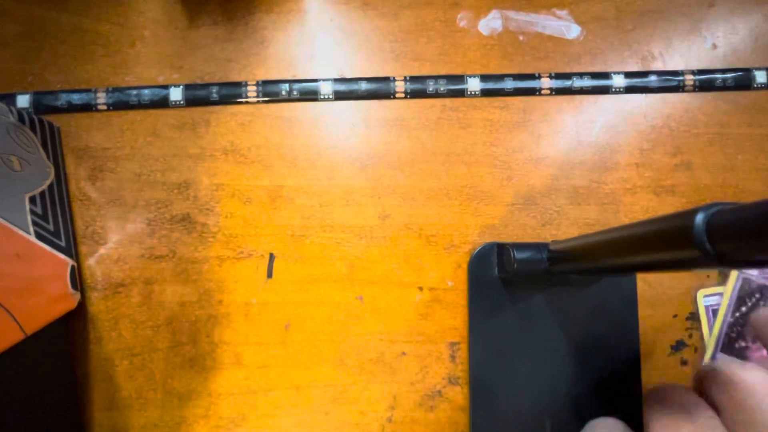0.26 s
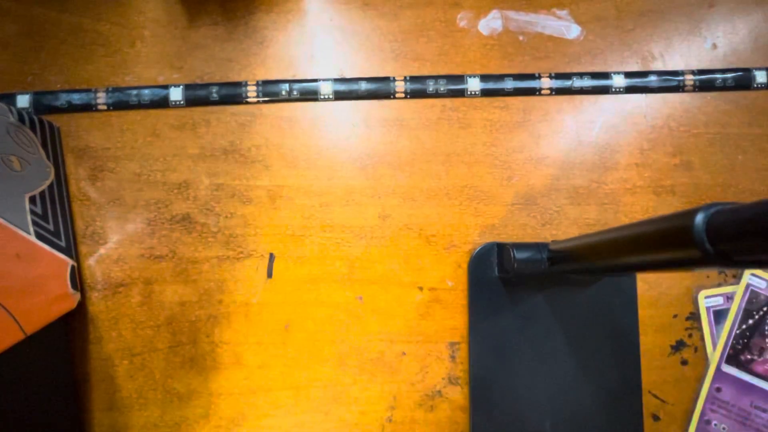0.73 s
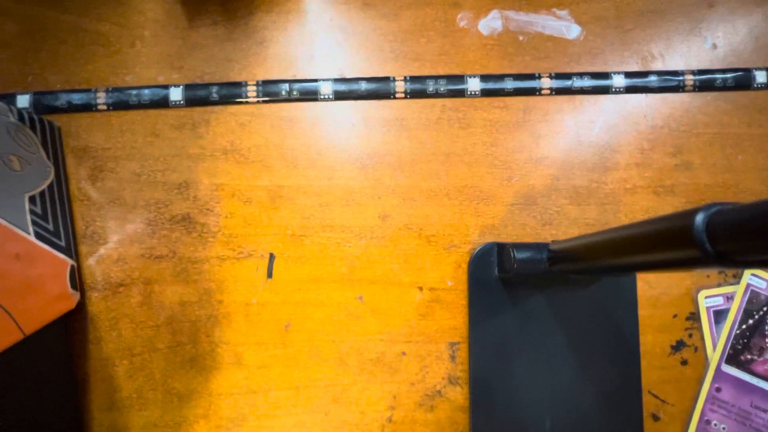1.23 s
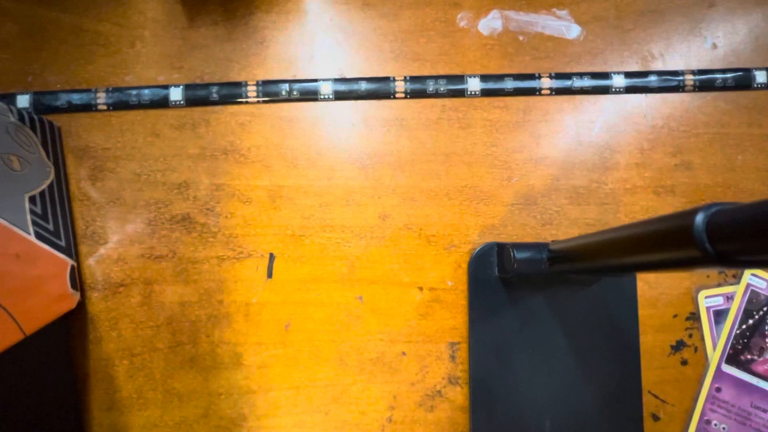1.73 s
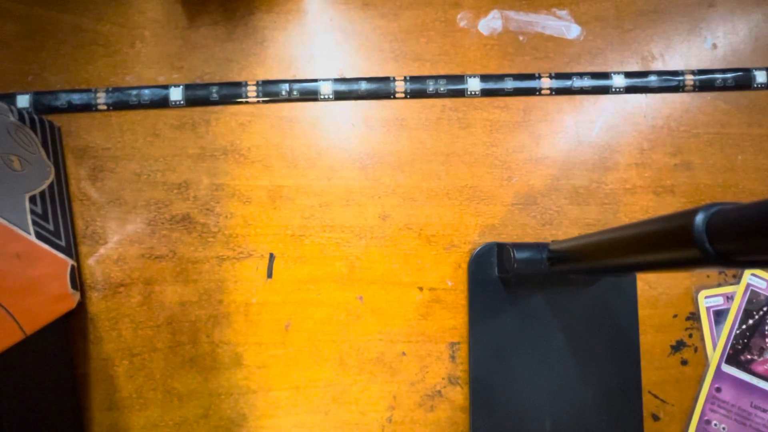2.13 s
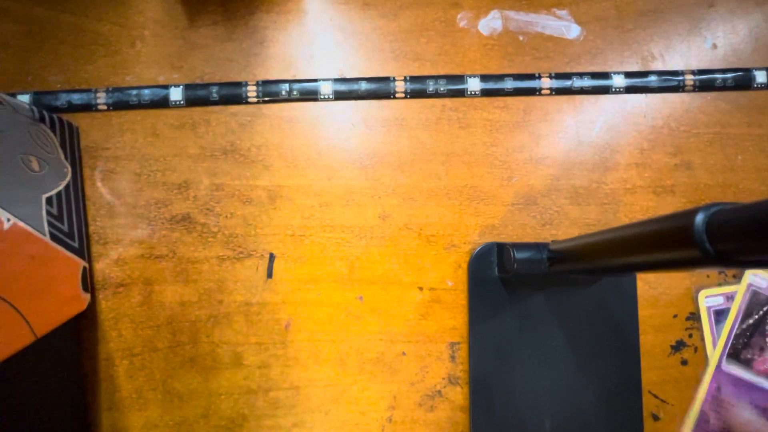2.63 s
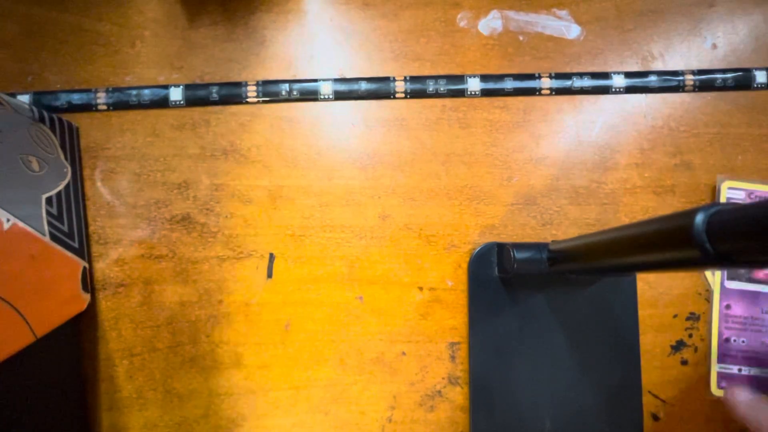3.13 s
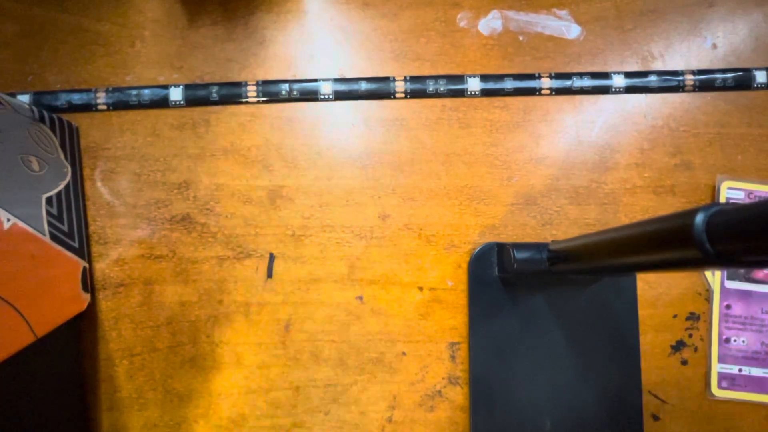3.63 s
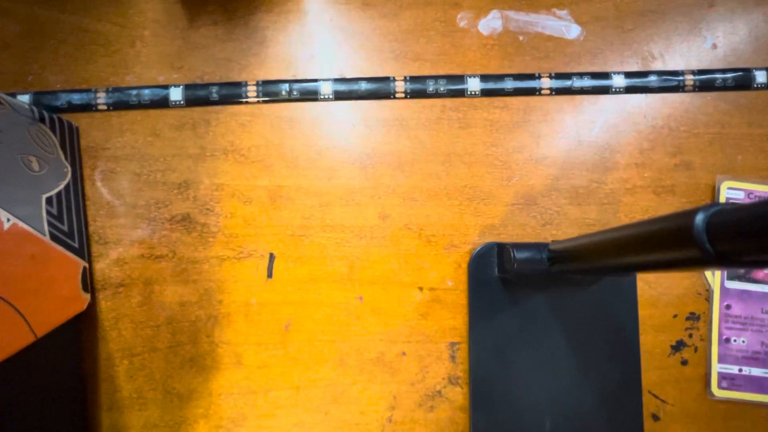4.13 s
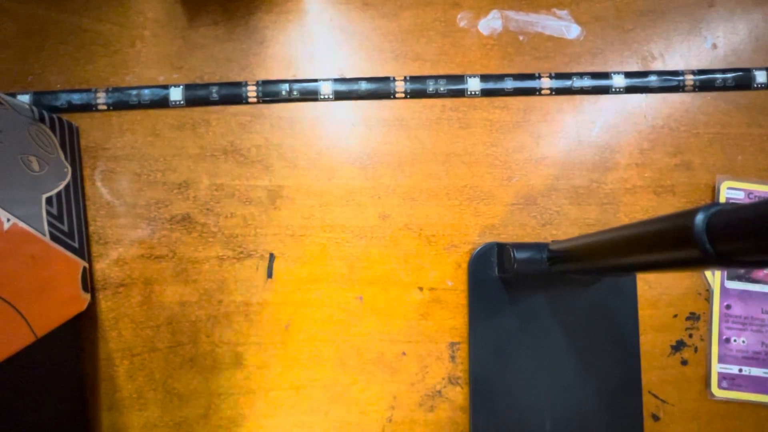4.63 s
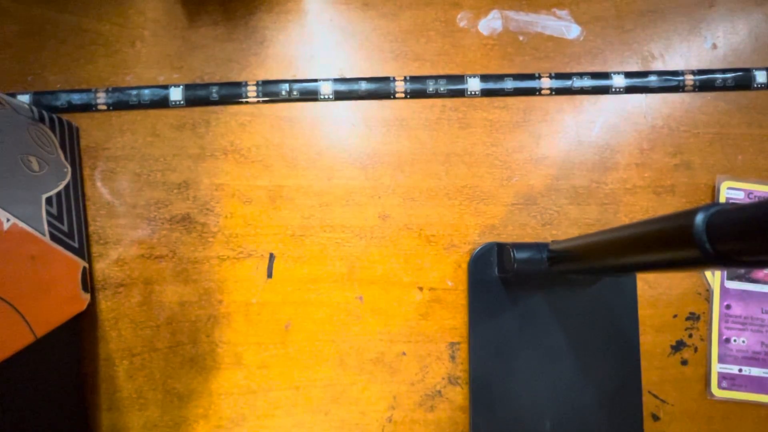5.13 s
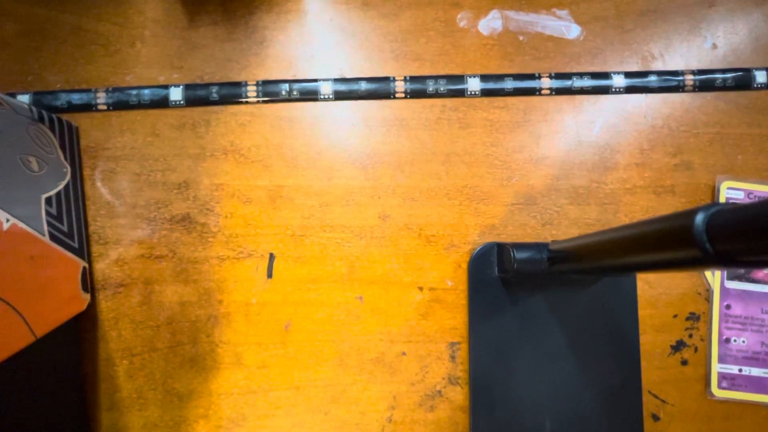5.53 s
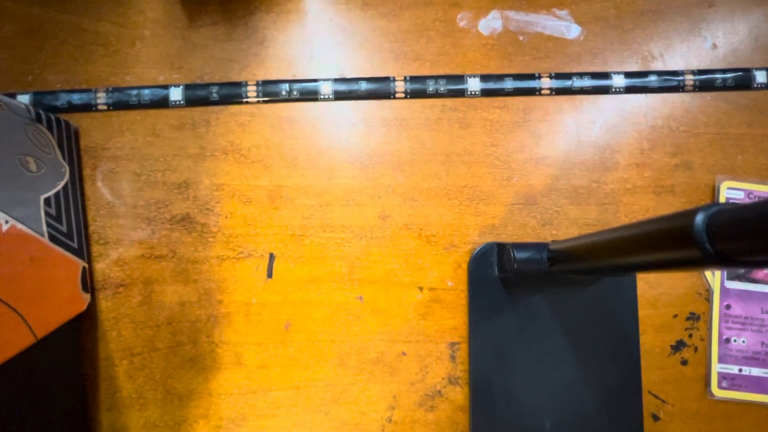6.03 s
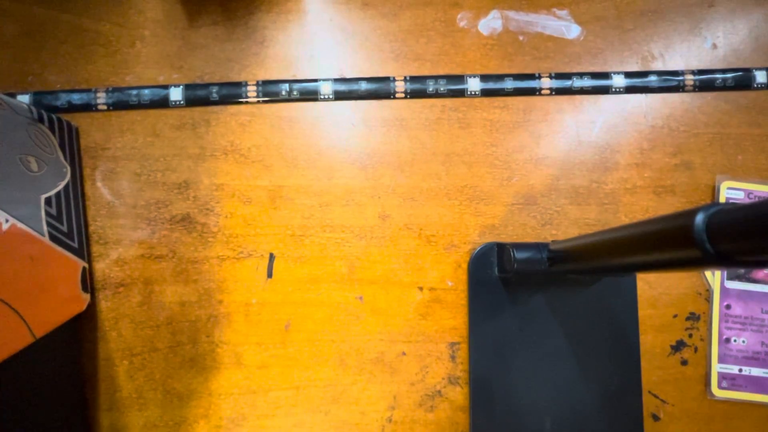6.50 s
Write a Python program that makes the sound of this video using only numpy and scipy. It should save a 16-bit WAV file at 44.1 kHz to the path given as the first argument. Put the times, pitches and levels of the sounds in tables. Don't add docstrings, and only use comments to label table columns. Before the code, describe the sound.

Small handling sounds of card against thin plastic, mostly left of a close stereo microphone indoors. Faint crinkly pops and taps, with gaps of quiet room tone, lead to a steady dry drag. A dense run of scrapes, finger knocks and clicks peaks in a hard snap, then eases into soft rubbing with low table thumps. Finally a sudden sharp crack and another cluster of hard knocks and scrapes.

```python
import sys
import numpy as np
from scipy import signal
from scipy.fft import rfft, irfft
from scipy.io import wavfile
from scipy.ndimage import uniform_filter1d, map_coordinates

SR = 44100
rng = np.random.default_rng(int(sys.argv[2]) if len(sys.argv) > 2 else 0)


def log_audio(samples):
    frames = np.atleast_2d(samples).T
    limited = np.clip(frames, -1, 1)
    pcm = np.round(limited * 32767).astype(np.int16)
    wavfile.write(sys.argv[1], SR, pcm)


def undo_db(level):
    steps = np.asarray(level, float) / 20
    return 10 ** steps


N = 298116

# frequency in Hz, density in dB per Hz.
AIR_SPECTRUM = [(18, -41.5), (30, 5.5), (131, -3.5), (233, -19), (319, -10.5), (866, -31), (937, -24),
                (1590, -30.5), (1810, -30.5), (13000, -40.5), (13800, -61)]
# frequency # in Hz, phase in radians.
PORT_PHASE_RAD = [(60, 1.2), (150, .9), (430, 1.9), (750, 2.35), (1200, 3.15), (1720, 3.9), (3450, 7.6),
                  (6900, 12.6), (8200, 14.4), (10500, 18.85), (13000, 18.85), (13600, 21.99)]
# frequency in Hz, left minus right in dB.
PORT_EXCESS_DB = [(60, 8), (300, 6), (700, 7.5), (1400, 3.5), (2600, 8), (5500, 8), (8000, 5), (9500, -2),
                  (10500, 0)]
# frequency in Hz, likeness from 0 to 1.
PORT_LIKENESS = [(60, .995), (500, .97), (2300, .8), (4000, .45), (8000, .35), (9500, .5), (10500, .99)]
# frequency in Hz, width in Hz, level in dB.
TABLE_MODES = [(60, 14, -5), (92, 14, -4), (110, 25, 0), (172, 45, -4.5), (305, 53, -2)]
# frequency in Hz, width in Hz, level in dB.
CARD_MODES = [(415, 90, 0), (670, 68, 4.5), (980, 290, -4.5), (1120, 81, 2.5), (1360, 78, -2),
              (1650, 62, -14.5), (2030, 180, -21.5), (2930, 410, -14.5), (3736, 540, -24.5)]
# frequency in Hz, level in dB.
FILM_SPECTRUM = [(1500, -4), (3000, 4.5), (5000, 6), (7500, -6.5), (9300, -16), (11000, -19.5),
                 (12800, -22), (13300, -32), (14200, -23.5), (15700, -22.5), (15900, -48.5)]
# frequency in Hz, level in dB.
POP_SPECTRUM = [(2500, -19), (6000, -1.5), (10000, 1.5), (15500, 1.5), (16200, -40.5)]
# start in seconds, peak in dB, pitch in Hz.
HAND_BUMPS = [
    (0.942, -31, 67.6),
    (3.753, -36, 75.5),
    (4.066, -29.5, 110.4),
    (4.89, -43, 69.2),
    (5.46, -38.5, 80.4),
    (5.687, -53, 92),
]
# start in seconds, peak in dB.
CREASE_POPS = [(0.1087, -43.5), (0.2468, -26.5), (0.4604, -54), (0.4743, -45), (0.8679, -49),
               (1.0021, -56.5), (1.0141, -55), (1.0525, -45), (1.7709, -56.5), (2.1474, -62), (2.4074, -60),
               (3.7848, -54.5), (3.8556, -60.5), (4.2073, -51), (4.366, -45), (5.0988, -65), (5.2081, -68),
               (5.23, -64.5), (5.6286, -61)]
# start in seconds, peak in dB, pitch in Hz, contact in ms.
EDGE_TICKS = [(0.4777, -53, 4970, 6.1), (0.9292, -41, 2040, 3.2), (1.0514, -39.5, 3670, 2.6),
              (1.0894, -58, 2420, 3.8), (3.0973, -45, 2400, 13), (3.124, -35, 2280, 6.6),
              (3.318, -45, 1280, 3), (3.3343, -39, 2400, 3.8), (3.474, -35, 2380, 1.7),
              (3.574, -16, 1350, 3.8), (3.5928, -17, 1360, 8.2), (5.9827, -14.5, 2388, 4),
              (6.291, -43.5, 1780, 1.5), (6.41, -54, 2400, 4), (6.44, -49.5, 2390, 2.4),
              (6.459, -59, 2360, 7.4), (6.6021, -33, 2380, 2.5), (6.6196, -27.5, 2360, 3.3),
              (6.6523, -29.5, 2310, 2.7)]
# start in seconds, peak in dB, card pitch in Hz, table thump in dB, contact in ms.
FILM_SNAPS = [(0.109, -39, 680, 6.5, 2.2), (0.252, -32.5, 443, 8.5, 4.4), (0.742, -57, 675, -2, 5.4),
              (0.808, -62.5, 3080, -14, 5.8), (1.02, -51, 1850, -16, 5.2), (1.771, -41.5, 2630, -26, 2.8),
              (2.033, -53.5, 640, -22, 5.3), (2.41, -43.5, 670, -23, 3.9), (2.963, -39, 1870, -23, 1.3),
              (3.499, -19, 685, -19.5, 4.6), (3.7, -38, 1360, -1, 5.5), (4.064, -39.5, 660, 4, 5.5),
              (4.206, -59.5, 573, 12, 4.8), (4.284, -34.5, 693, -7.5, 4.16), (5.228, -55.5, 570, 2, 3.9),
              (6.291, -46.5, 549, -26.5, 7.3)]
# start in seconds, peak in dB, card pitch in Hz, table thump in dB, contact in ms.
CARD_TAPS = [(0.474, -56.5, 1530, -10, 3.1), (0.944, -29.5, 464, 1.5, 3.4), (1.052, -44, 960, -17, 14),
             (2.155, -57.5, 640, 5, 9.9), (2.911, -34, 810, -29, 2.8), (2.93, -41, 1010, -32, 3.7),
             (3.284, -38, 447, 0, 5.5), (3.394, -40.5, 714, -15, 8.2), (3.429, -29, 565, -22, 9.5),
             (3.475, -26.5, 725, -16, 20), (3.569, -6, 684, -13.5, 8.6), (3.592, -16, 897, -21, 12),
             (3.902, -35, 787, -5, 4.2), (4.765, -51.5, 570, 10.5, 1.2), (5.984, -9, 593, -22, 4.77),
             (6.259, -43, 820, -22, 3.7), (6.327, -42, 490, -8, 6.6), (6.434, -46, 540, -29, 7.8),
             (6.525, -51.5, 483, 6, 2.8), (6.589, -25, 880, -9, 1.7), (6.604, -23, 660, -21, 4.3)]
# start in seconds, peak in dB, card pitch in Hz, table thump in dB, contact in ms.
FINGER_KNOCKS = [(1.53, -43.5, 647, 6.5, 9.4), (2.393, -38, 475, 4, 1.35), (2.919, -37.5, 770, -31, 5.1),
                 (2.947, -36, 1950, -24, 0.91), (3.055, -47.5, 590, 0, 13.5), (3.096, -31.5, 2640, 4, 7.1),
                 (3.252, -31, 3580, -17, 1), (3.456, -24.5, 714, -7.5, 5.4), (3.981, -44, 921, 7.5, 6),
                 (6.127, -33.5, 773, -29, 3.2), (6.138, -31.5, 524, -18, 4.4), (6.407, -41, 574, -6, 5.5),
                 (6.621, -20, 800, -3, 6.6), (6.634, -15.5, 578, -12, 13.4),
                 (6.746, -32.5, 602, -15.5, 3.7)]
# time in seconds, pitch in Hz, level over scrape in dB.
POCKET_GLIDES = [
    [(1.05, 5100, -6), (1.12, 5000, -4), (1.2, 4900, -9)],
    [(2.45, 3500, -9), (2.58, 3050, -5), (2.68, 2900, -4), (2.75, 2450, -3), (2.86, 2400, -4)],
]
# start in seconds, length in seconds, scrape in the card in dB,
# hiss of the film in dB, load on the table in dB.
JERK_STROKES = [(0.258, 0.085, -80, -67, -40.5), (0.94, 0.098, -52, -59.5, -38),
                (1.048, 0.19, -51, -65.5, -45), (1.527, 0.085, -47, -83, -44.5),
                (2.85, 0.25, -55.5, -64.5, -52.5), (3.092, .13, -37, -55, -38.5),
                (3.25, 0.027, -48.5, -54.5, -50), (3.394, 0.042, -52, -56.5, -49),
                (3.585, 0.17, -32.5, -44.5, -45), (3.745, 0.079, -65, -70.5, -50),
                (4.2, 0.11, -77, -67.5, -61.5), (4.28, 0.038, -58.5, -56, -56),
                (4.76, 0.085, -62.5, -69, -54), (0.112, 0.12, -68.5, -69, -79.5),
                (5.228, 0.044, -58, -76, -52), (5.626, 0.16, -43.5, -56, -37.5),
                (5.81, 0.14, -63.5, -77, -53.5), (5.995, 0.12, -40, -55, -41.5),
                (6.125, 0.086, -50, -77, -49.5), (6.255, 0.22, -61, -76, -47),
                (6.588, 0.064, -40, -55.5, -28), (6.672, 0.18, -56.5, -68.5, -51),
                (1.975, 0.06, -71, -92, -76)]
# start in seconds, length in seconds, scrape, hiss and load in dB.
SWELL_STROKES = [(0.4, 0.13, -78, -75, -78), (0.55, 0.1, -91, -89, -61), (3.865, .12, -40, -49.5, -42),
                 (3.97, 0.15, -49.5, -56, -46), (4.54, 0.12, -76, -69.5, -67.5),
                 (5.35, 0.26, -45.5, -59, -47.5), (6.38, 0.11, -52, -82.5, -48.5),
                 (6.615, 0.059, -30, -48.5, -30.5), (1.62, 0.37, -50.5, -67.5, -52.5),
                 (6.52, 0.12, -64, -76, -54), (4.81, 0.1, -62, -68, -52), (5.03, 0.13, -57, -73.5, -51),
                 (5.24, 0.092, -59.5, -72, -51)]
# start in seconds, length in seconds,
# scrape, hiss and load in dB.
DRAG_STROKES = [(0.19, 0.073, -63.5, -65, -65.5), (0.9, 0.037, -42.5, -51, -50),
                (4.3, 0.083, -62, -64, -66), (1.22, 0.18, -68.5, -77, -60), (1.46, 0.04, -67, -100.5, -61),
                (1.8, 0.17, -60.5, -75, -78), (2.0, 0.21, -74, -86, -67.5),
                (2.32, 0.51, -44.5, -61.5, -47.5), (3.275, 0.019, -64, -70, -48),
                (3.3, 0.042, -35, -55.5, -40.5), (3.425, 0.099, -46.5, -55, -39),
                (3.52, 0.056, -53, -63, -42), (5.93, 0.033, -71.5, -80.5, -64), (5.963, .02, -40, -57, -46),
                (4.09, 0.091, -73, -70.5, -61)]


def unit_rms(x):
    return x / np.sqrt(np.mean(abs(x) ** 2) + 1e-20)


def scale_peak(x, peak_db):
    return undo_db(peak_db) * x / abs(x).max()


def read_curve(points, hz):
    point_hz, value = np.transpose(points)
    return np.interp(np.log(hz + 1), np.log(point_hz + 1), value)


def colour(x, points):
    hz = np.fft.rfftfreq(len(x), 1 / SR)
    return irfft(rfft(x) * undo_db(read_curve(points, hz)), len(x))


def low_pass(x, cut_hz):
    return signal.sosfilt(signal.butter(3, cut_hz, fs=SR, output="sos"), x)


def mode(x, hz, width_hz):
    return signal.lfilter(*signal.iirpeak(hz, max(hz / width_hz, .3), SR), x)


def double_mode(x, hz, width_hz):
    return mode(mode(x, hz, width_hz), hz, width_hz)


def body(x, modes):
    out = 0
    for k, (hz, width_hz, db) in enumerate(modes):
        out = out + (-1) ** k * undo_db(db) * mode(x, hz, width_hz)
    return out


def shove(noise, contact_ms):
    ms = 1000 * np.arange(len(noise)) / SR
    u = ms / np.clip(contact_ms, .8, 30)
    push = np.minimum(4 * u, 1) * np.exp(-(u / 1.25) ** 3)
    touch = 1.7 * np.exp(-ms / 0.12)
    return noise * (push + touch)


def air():
    a, b = (unit_rms(colour(v, AIR_SPECTRUM)) for v in rng.standard_normal((2, N)))
    return undo_db(-69) * np.array([undo_db(6.0) * a, 0.17 * a + 1.6 * b])


def scatter(x, t60_s):
    t = np.arange(round(t60_s * SR)) / SR
    tail = rng.standard_normal(len(t)) * undo_db(-60 * t / t60_s)
    return signal.oaconvolve(x, tail / np.linalg.norm(tail))[:N]


def ports(left):
    hz = np.fft.rfftfreq(N, 1 / SR)
    alike = np.clip(read_curve(PORT_LIKENESS, hz), 0, 1)
    direct = alike * np.exp(-1j * read_curve(PORT_PHASE_RAD, hz)) * rfft(left)
    other = np.sqrt(1 - alike ** 2) * rfft(scatter(left, t60_s=.06))
    right = irfft((direct + other) * undo_db(-read_curve(PORT_EXCESS_DB, hz)), N)
    return np.array([left, right])


def bumps():
    out, t = np.zeros(N + 8000), np.arange(8000) / SR
    for start_s, peak_db, hz in HAND_BUMPS:
        push = np.sin(2 * np.pi * hz * t) * t * np.exp(-t / 0.013)
        out[round(start_s * SR):][:8000] += scale_peak(push, peak_db)
    return out[:N]


def crease_pops():
    out = np.zeros(N + 1000)
    for start_s, peak_db in CREASE_POPS:
        pop = colour(shove(rng.standard_normal(1000), contact_ms=2.3), POP_SPECTRUM)
        out[round(start_s * SR):][:1000] += scale_peak(pop, peak_db + 2.0)
    return out[:N]


def edge_ticks():
    out = np.zeros(N + 2000)
    for start_s, peak_db, hz, contact_ms in EDGE_TICKS:
        push = shove(rng.standard_normal(2000), contact_ms)
        tick = double_mode(push, hz, 0.096 * hz)
        out[round(start_s * SR):][:2000] += scale_peak(tick, peak_db + 5.5)
    return out[:N]


def contacts():
    near, low = np.zeros((2, N + 8000))
    bump = np.sin(np.pi * np.minimum(np.arange(8000) / SR / 0.0036, 1)) ** 2
    thump = body(bump, TABLE_MODES)
    for rows, crack_db in [(FILM_SNAPS, -7.5), (CARD_TAPS, -16.5), (FINGER_KNOCKS, -31.5)]:
        for start_s, peak_db, hz, thump_db, contact_ms in rows:
            noise = rng.standard_normal((2, 8000))
            push = shove(noise[0], contact_ms)
            main = 2 * double_mode(push, hz, 0.42 * hz)
            card = main + 0.64 * low_pass(body(push, CARD_MODES), cut_hz=3 * hz + 900)
            crack = colour(shove(noise[1], .55 * contact_ms), FILM_SPECTRUM)
            crack = crack * (np.arange(8000) < 4000)
            at = round(start_s * SR)
            near[at:][:8000] += scale_peak(card, peak_db + 6.5)
            near[at:][:8000] += scale_peak(crack, peak_db + crack_db + 10.0)
            low[at:][:8000] += scale_peak(thump, peak_db + thump_db)
    return near[:N], low[:N]


def strokes():
    out, full = np.zeros((3, N)), (0, 0, 0)
    # rows, turning point in s, then scrape, hiss and load in dB at start, turn and end
    kinds = [(JERK_STROKES, lambda length_s: .008, (-12, -8, -14.5), full, (-23, -22, -10)),
             (SWELL_STROKES, lambda length_s: .4 * length_s, (-23, -17.5, -15.5), full, (-15, -14, -7.5)),
             (DRAG_STROKES, lambda length_s: .2 * length_s, (-14, -9, -12), (-4.5, -1.5, -0.5), full)]
    for rows, turn_s, *shape_db in kinds:
        for start_s, length_s, *top_db in rows:
            at = np.arange(round(start_s * SR), min(round((start_s + length_s) * SR), N))
            corners_s = [0, turn_s(length_s), length_s]
            out[:, at] += [undo_db(db + np.interp(at / SR - start_s, corners_s, stages_db))
                           for db, stages_db in zip(top_db, np.transpose(shape_db))]
    lift_db = np.arange(N) / SR * 900
    level_db = 20 * np.log10(out + 1e-9)
    out = undo_db(np.maximum.accumulate(level_db + lift_db, axis=1) - lift_db)
    return uniform_filter1d(out, size=100, axis=1)


def slips(per_s, spread_db, clump_db, clump_s):
    size = undo_db(spread_db * np.minimum(rng.exponential(1, N), 4)) * rng.standard_normal(N)
    clumps = unit_rms(uniform_filter1d(rng.standard_normal(N), round(clump_s * SR)))
    happens = rng.random(N) < per_s / SR
    return unit_rms(size * happens * undo_db(clump_db * clumps))


def pocket(kicks):
    out = np.zeros(N)
    r = np.exp(-np.pi * 380 / SR)
    for rows in POCKET_GLIDES:
        s, hz, db = np.transpose(rows)
        at = np.arange(round(s[0] * SR), round(s[-1] * SR))
        turn = np.exp(2j * np.pi * np.cumsum(np.interp(at / SR, s, hz)) / SR)
        smooth = signal.lfilter([1 - r], [1, -r], kicks[at] / turn)
        out[at] = unit_rms((turn * smooth).real) * undo_db(np.interp(at / SR, s, db))
    return out


def patchy(x, depth_db):
    z = signal.stft(x, nperseg=512, noverlap=384)[2]
    field = uniform_filter1d(rng.standard_normal(z.shape), size=6, axis=0)
    field = unit_rms(uniform_filter1d(field, size=22, axis=1))
    return signal.istft(z * undo_db(depth_db * field), nperseg=512, noverlap=384)[1][:len(x)]


def table_echo(x, delay_ms, sway, gain):
    t = np.arange(N) / SR
    waves = [np.sin(2 * np.pi * (hz * t + rng.random())) / np.sqrt(hz) for hz in np.geomspace(.3, 3, 12)]
    drift = unit_rms(sum(waves))
    late = np.arange(N) - delay_ms * SR / 1000 * (1 + sway * drift)
    return (x + gain * map_coordinates(x, [late], order=3)) / np.sqrt(1 + gain ** 2)


def rubbing():
    scrape, hiss, load = strokes()
    kicks = slips(per_s=5500, spread_db=0.5, clump_db=2.0, clump_s=0.009)
    fine = slips(per_s=3100, spread_db=3.0, clump_db=2.5, clump_s=0.032)
    heavy = slips(per_s=810, spread_db=1.5, clump_db=3.5, clump_s=0.041)

    broad = colour(kicks, [(250, -30.5), (600, 5.5), (3000, -4.5), (5000, -40.5)])
    card = unit_rms(body(kicks, CARD_MODES)) + 0.78 * unit_rms(broad)
    edge = np.clip(11 * hiss / (scrape + 1e-7), .05, 1)
    card = edge * low_pass(card, cut_hz=5230) + (1 - edge) * 1.9 * low_pass(card, cut_hz=1280)

    film = unit_rms(colour(.5 * kicks + fine, FILM_SPECTRUM))
    skin = np.clip(0.56 * hiss / (scrape + 1e-7), 0, 1.5)
    film = film + skin * colour(film, [(5000, -42.0), (8000, 17), (16000, 18)])

    knead = unit_rms(low_pass(body(heavy, TABLE_MODES), cut_hz=561.6))
    rub = undo_db(4.0) * scrape * (card + pocket(kicks)) + undo_db(7.0) * hiss * film
    return rub, undo_db(1.0) * load * knead


def scene():
    rub, rumble = rubbing()
    tap, thump = contacts()
    rub = patchy(rub, depth_db=2.6)
    rub = table_echo(rub, delay_ms=1.38, sway=.1, gain=.3)
    hands = rub + rumble + tap + thump + edge_ticks() + bumps() + crease_pops()
    room = undo_db(-19) * scatter(hands, t60_s=.2)
    return ports(hands + room) + air()


def top_cut(x):
    return signal.sosfilt(signal.butter(12, 16310, fs=SR, output="sos"), x)


def record(dry):
    cut = signal.sosfilt(signal.butter(3, 46, "high", fs=SR, output="sos"), dry)
    held = cut / (1 + (abs(cut) / .95) ** 6) ** (1 / 6)
    return top_cut(held)


dry = scene()
out = record(dry)
log_audio(out)
```